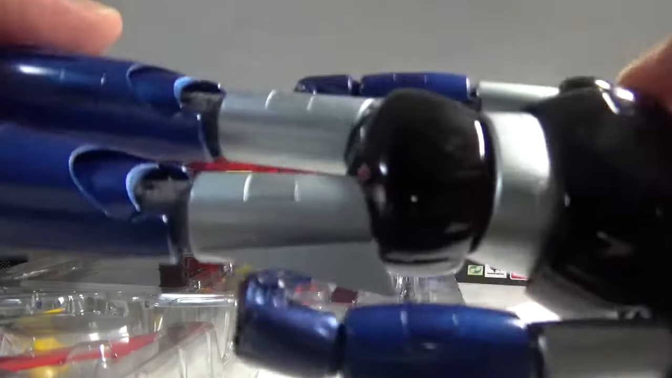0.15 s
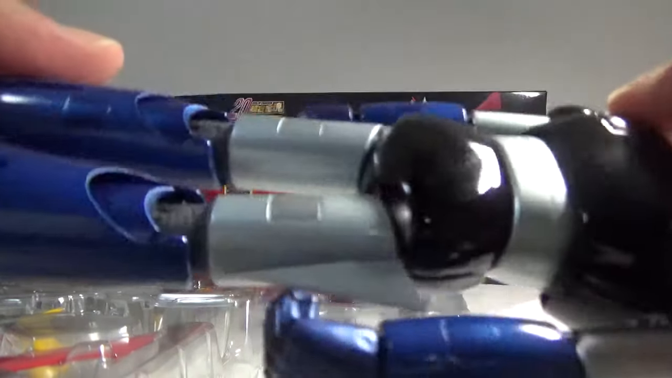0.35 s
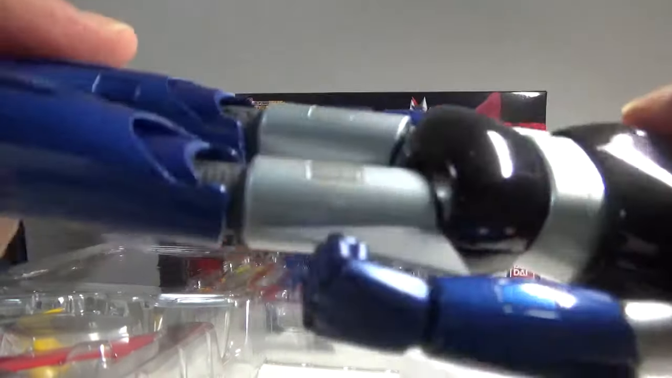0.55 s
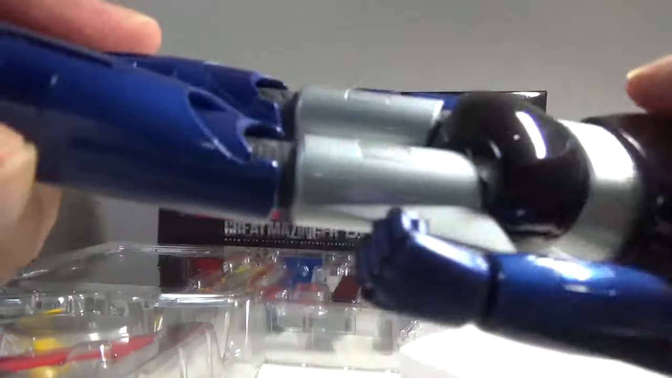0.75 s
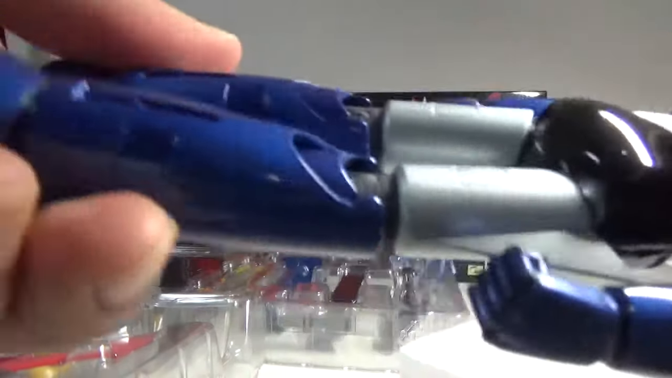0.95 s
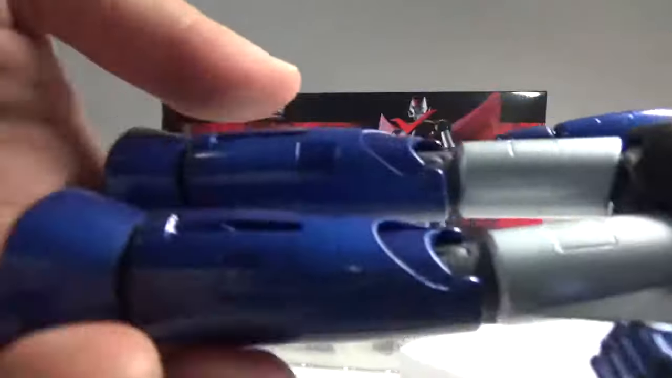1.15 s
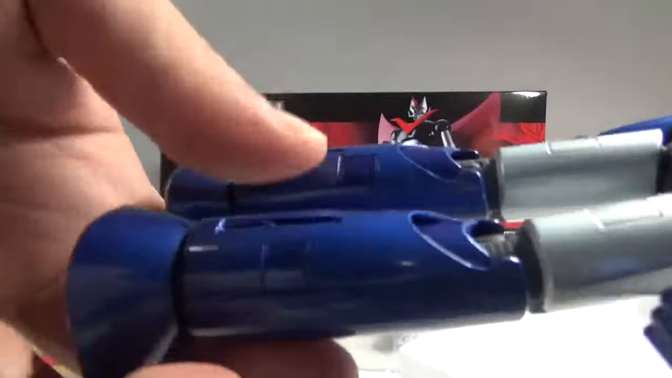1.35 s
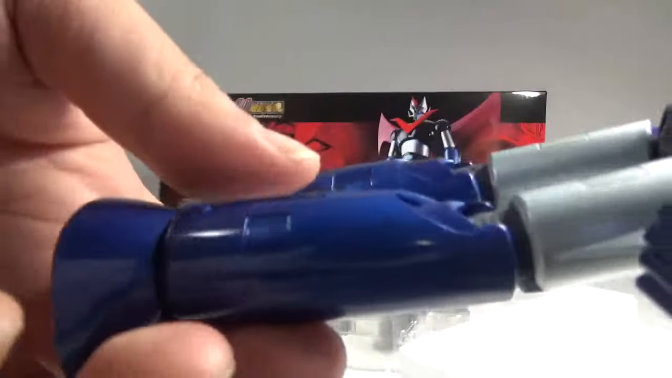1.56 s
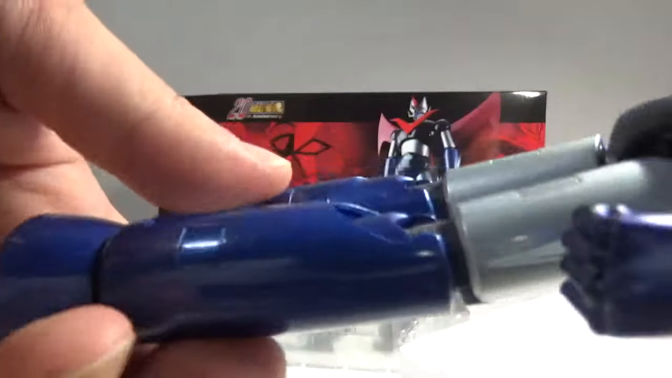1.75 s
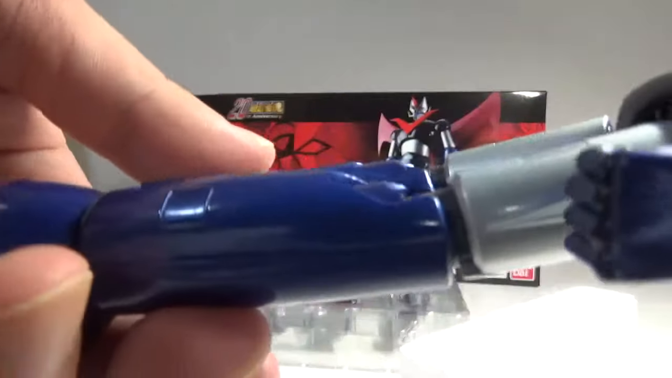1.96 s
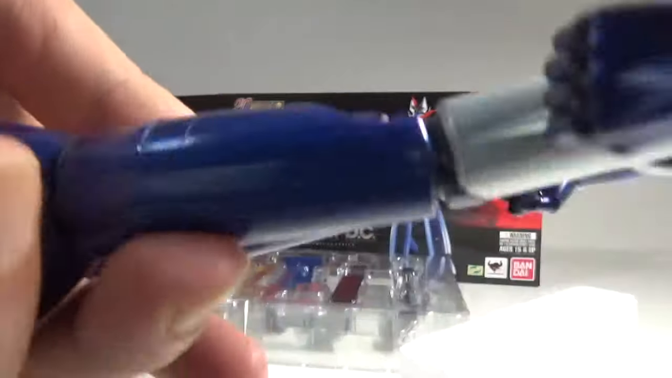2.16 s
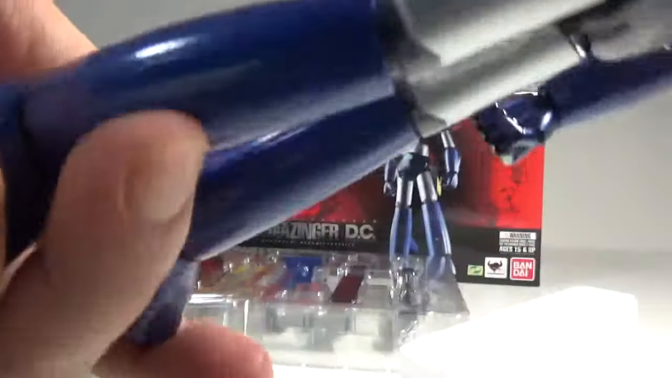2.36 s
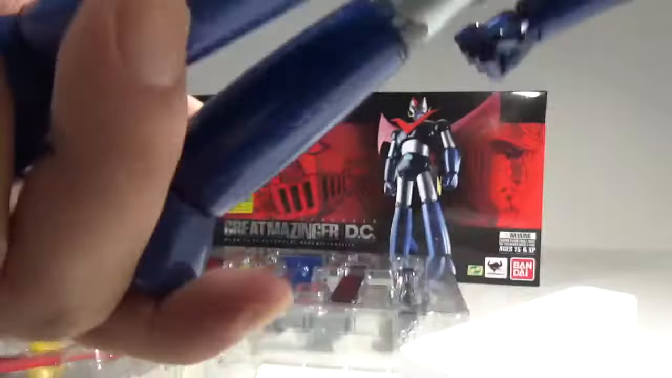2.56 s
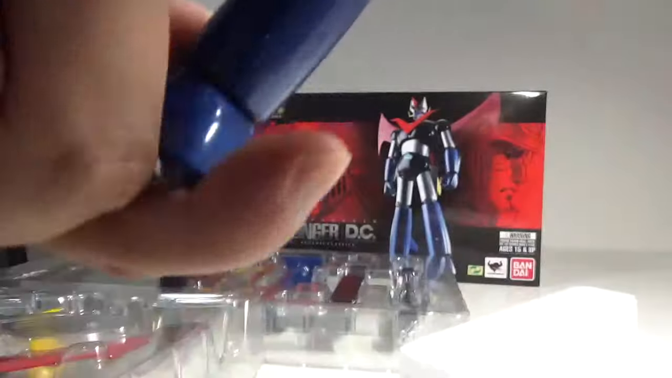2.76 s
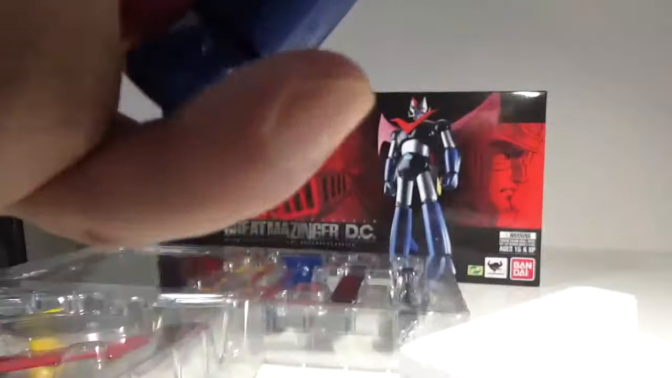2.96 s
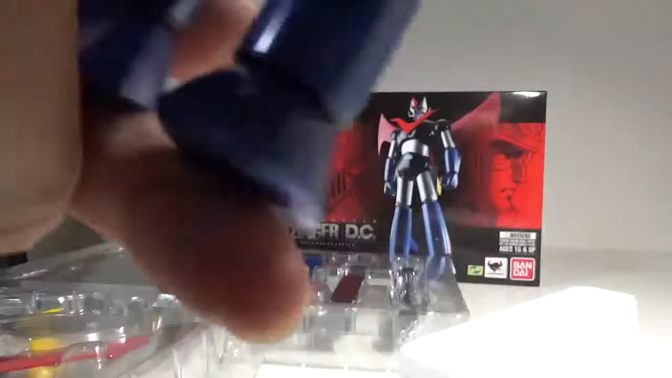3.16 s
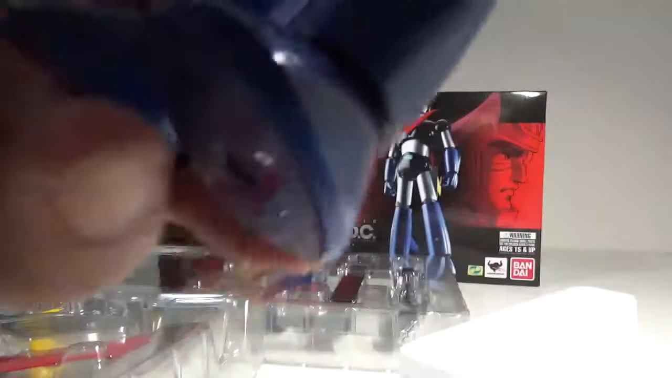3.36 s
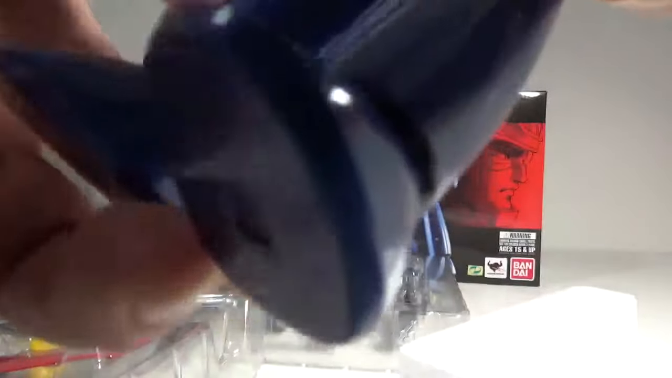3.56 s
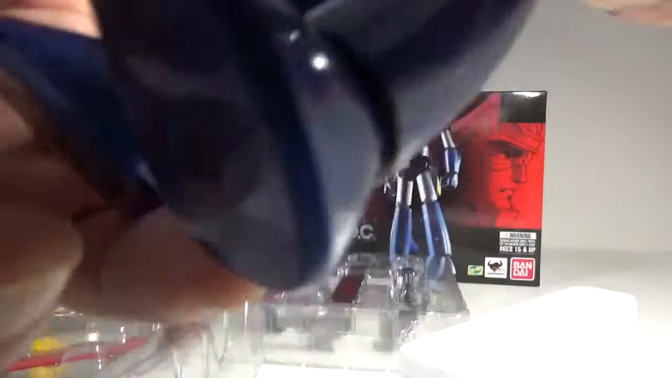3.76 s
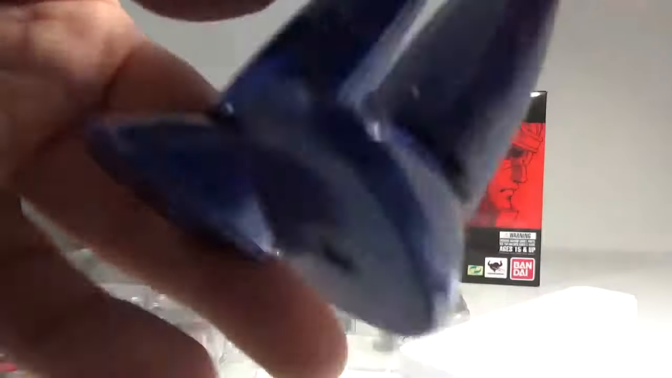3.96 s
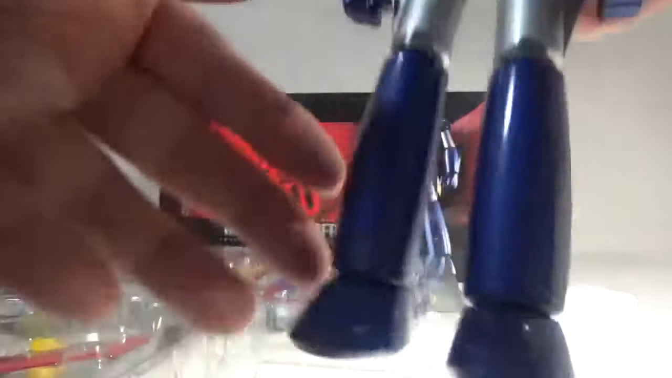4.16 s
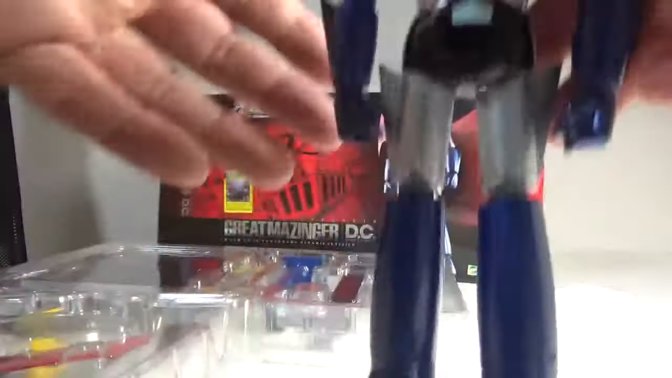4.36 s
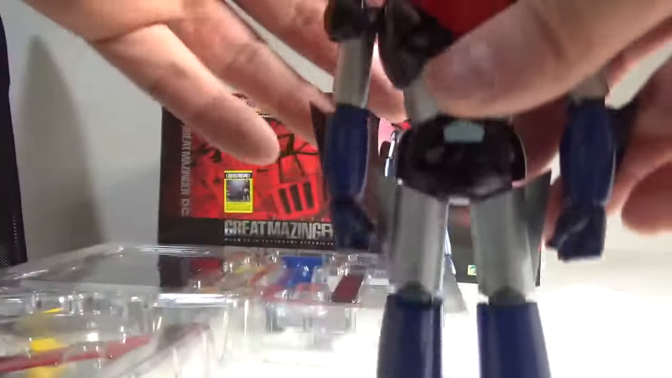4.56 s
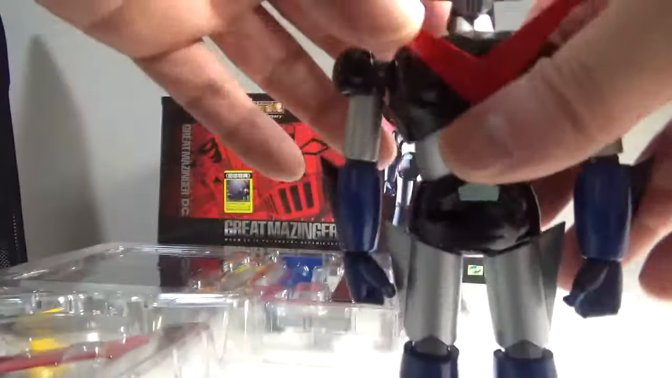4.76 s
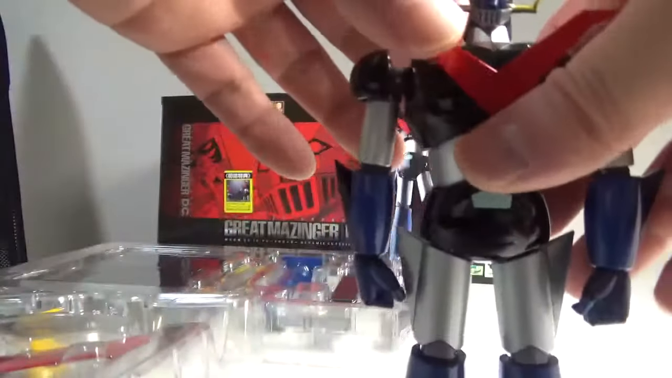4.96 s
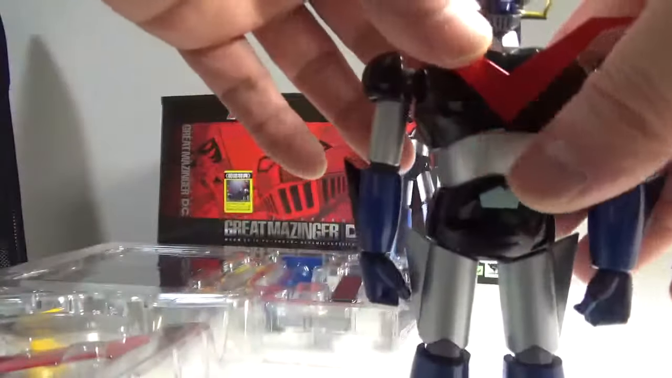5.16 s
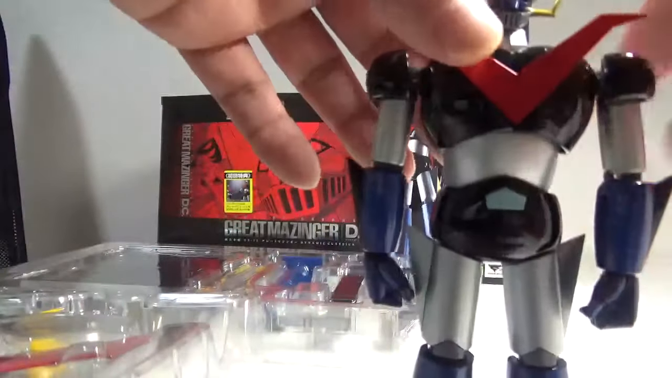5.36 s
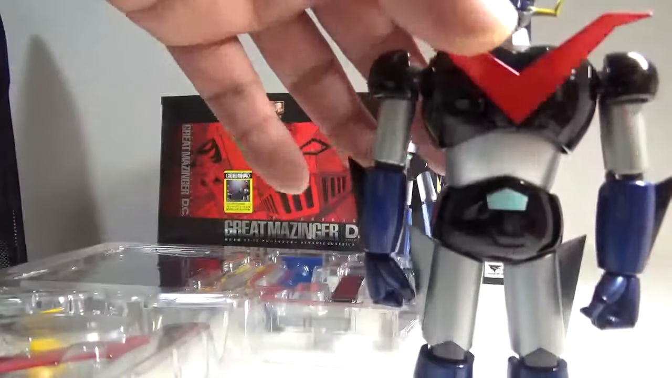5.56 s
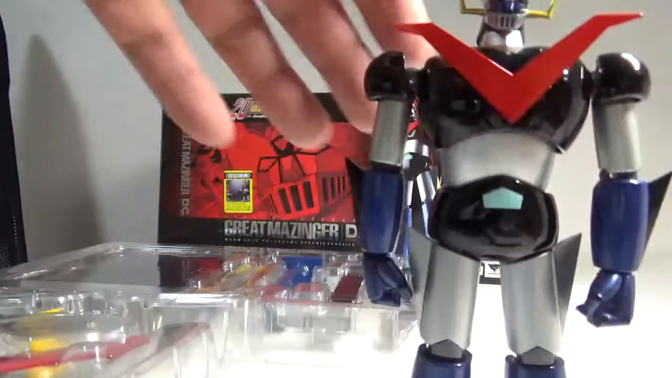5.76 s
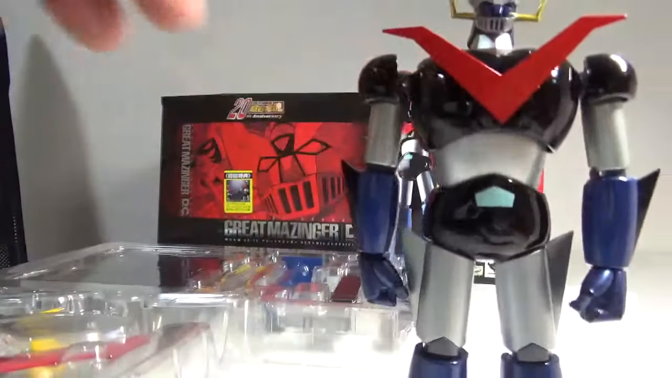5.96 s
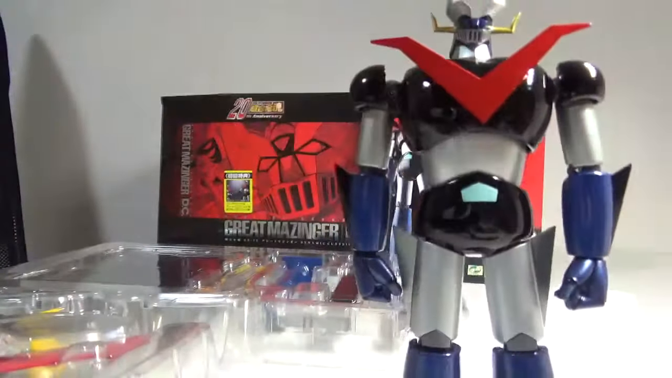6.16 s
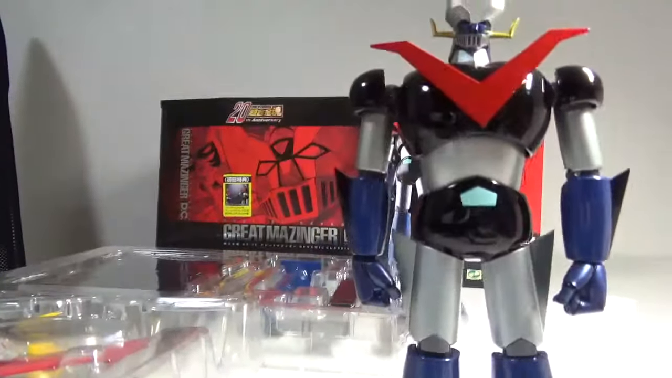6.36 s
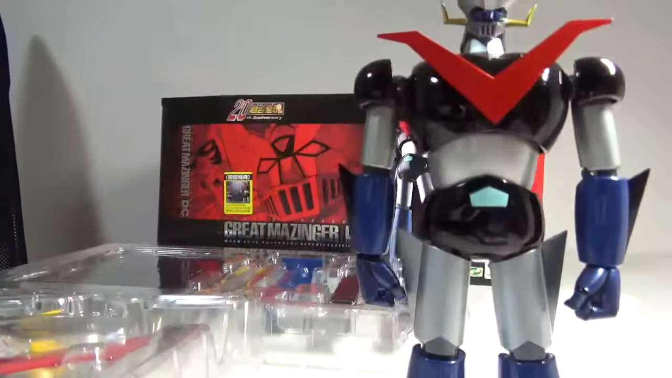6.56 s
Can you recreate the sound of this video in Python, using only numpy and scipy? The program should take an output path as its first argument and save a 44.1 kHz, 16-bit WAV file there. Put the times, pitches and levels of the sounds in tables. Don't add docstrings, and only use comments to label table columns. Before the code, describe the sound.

Irregular tiny metallic snaps and ticks from a die-cast figure's limbs, close and crisp, with airy finger friction and a brief cloth brush on the table. A sharp snap stands alone midway, then it grows sparser. A solid woody knock lands with a rattling click, then smaller taps as the feet settle, and finally light plastic tray crackle. Short indoor room tail, quiet rumble, steady hiss and a barely audible high whine.

```python
import sys
import numpy as np
from scipy import signal
from scipy.fft import rfft, irfft, next_fast_len
from scipy.io import wavfile
from scipy.ndimage import uniform_filter1d

SR = 44100
rng = np.random.default_rng(int(sys.argv[2]) if len(sys.argv) > 2 else 0)


def file_out(sig):
    cols = np.atleast_2d(sig).T
    lim = np.clip(cols, -1, 1)
    pcm = np.round(lim * 32767).astype(np.int16)
    wavfile.write(sys.argv[1], SR, pcm)


def rack_gain(trim_db):
    fader = np.asarray(trim_db, float)
    return 10 ** (fader / 20)


N = 295456

# pitch_hz, level_db
EDGE_MODES = [(7200, 7), (7900, 8.5), (8500, 19), (9000, 15.5), (9500, 16.5), (10100, -1.5), (10700, -26.5)]
JOINT_MODES = [(4750, -10), (5250, 16.5), (5800, 6), (6300, 3)]
LIMB_MODES = [(3150, -5), (3480, 8), (3750, -0.5), (4050, -11.5)]
SHELL_MODES = [(1150, 5), (1450, -43), (1750, -13), (2050, 20), (2400, 18.5), (2700, 11.5)]
TRAY_MODES = [(800, -20), (1100, -5), (1400, 9), (1750, 15), (2100, 13), (2500, 9), (2900, 20)]

# start_s, edge_db, limb_db, left_minus_right_db
LIMB_CLICKS = [(0.0358, -25, -61, -4), (0.5934, -55, -50, -2), (0.697, -32, -39.5, 2),
               (0.7604, -29, -30, -5.5), (0.8904, -50, -42.5, 3), (1.0188, -52.5, -51.5, 1),
               (1.2258, -29, -44, -5), (1.7524, -37, -38.5, -6), (1.765, -47, -45, 8),
               (1.7866, -41, -48, 11), (1.8214, -44, -49, 9), (1.8286, -45, -43.5, 8),
               (1.8444, -44, -49, 8), (2.2972, -30, -38, 4), (2.3068, -47, -43.5, -2),
               (2.369, -52, -44.5, 2.1), (2.3983, -47.5, -54, -9), (2.407, -50, -48, 4),
               (2.4345, -51, -43, 2.1), (2.4544, -47, -40.5, 3), (2.576, -36.5, -37, 6),
               (2.6391, -39.5, -35, 4), (2.8735, -29, -34, -7.5), (2.8974, -39, -33, 1),
               (2.9251, -57, -42.5, 0.1), (3.065, -61, -51.5, -0.6), (3.155, -42, -45, 3.5),
               (3.2405, -37, -55, 14), (4.7536, -30.5, -53, 1.5), (4.7636, -26, -44, -3.5)]
# start_s, edge_db, joint_db, left_minus_right_db
JOINT_CLICKS = [(0.0138, -37, -39.5, -6), (0.0277, -18, -32.5, 6.5), (0.6233, -39.5, -53, 3),
                (0.7096, -38.5, -44.5, -11), (0.725, -40, -48, 8), (0.7648, -24, -34, 6),
                (0.78, -16.5, -34, 3), (0.9323, -44, -54, -6), (0.9518, -47, -58, -4),
                (1.4224, -41, -47.5, -0.6), (2.0252, -52, -57, 0.1), (2.357, -54, -54, -7),
                (2.7106, -41.5, -55, 3), (2.8673, -11.5, -30, -2.5), (2.992, -42, -45.5, -2.5),
                (3.427, -43.5, -55, 8), (5.0245, -54, -68, 1), (5.0675, -27, -50, 6),
                (5.1573, -59.5, -56, 1), (5.2484, -44, -66, 2), (5.33, -29, -43.5, -6.5)]
# start_s, edge_db, shell_db, left_minus_right_db
SHELL_CLICKS = [(0.5799, -33, -48, 5), (0.915, -48, -56, -6), (1.14, -43, -59.5, 10),
                (1.7324, -52, -59, -1.1), (1.7442, -25, -36, 5), (1.8548, -31, -41.5, 3.5),
                (2.559, -42, -54, -11), (3.1067, -51, -60, 10), (3.186, -48, -62, 8), (3.23, -45, -56, 8),
                (3.4755, -16, -48, 3.5), (3.6194, -51, -67, 4), (4.7583, -28, -50, -9),
                (4.7724, -17.5, -30, 2.5), (4.886, -42.5, -60, -5), (4.973, -22, -40.5, 1.1),
                (5.1155, -69, -58, -4), (5.239, -44, -70, 4), (5.5652, -51, -67, 0.1),
                (6.1523, -31, -48, -3.5)]
# start_s, edge_db, tray_db, left_minus_right_db
CRACKLES = [
    (6.3468, -48, -38.5, 11),
    (6.3496, -42, -37, -8),
    (6.356, -33.5, -49, 4),
    (6.3857, -55, -48, -12),
    (6.3958, -37, -34.5, -9),
    (6.4007, -27, -32, 6),
    (6.4075, -44, -39.5, 11),
    (6.4127, -54, -66, -6),
    (6.517, -54, -62, 0.1),
    (6.546, -48.5, -45, -3),
]
# joints_db, limbs_db, shell_or_tray_floor_db
LIMB_SPREAD_DB, JOINT_SPREAD_DB = (-10, 1.6, -7.5), (2, -1.4, -10.5)
SHELL_SPREAD_DB, TRAY_SPREAD_DB = (-0.31, -9, 4.7), (-7.5, 0.5, 5.3)
PART_T60_S, TRAY_T60_S = .008, .004

# start_s, peak_db, pitch_hz,
# t60_s
PART_RINGS = [(0.027, -39, 5270, 0.03), (0.028, -25, 8600, 0.0077), (0.741, -50, 8140, 0.096),
              (0.7637, -37, 3735, 0.14), (0.7625, -24, 4880, 0.026), (0.762, -28, 3300, .02),
              (0.763, -38, 2800, .027), (0.781, -36, 2750, .015), (0.036, -40, 8500, .06),
              (1.7455, -40, 2000, .015), (1.7455, -38, 2900, .015), (1.856, -42, 2150, .015),
              (1.445, -58, 3000, .01), (1.016, -64, 5500, 0.2), (1.1394, -41.5, 8490, 0.012),
              (1.225, -31, 3720, 0.014), (1.748, -33.5, 1020, 0.038), (4.7741, -13, 1260, 0.0064),
              (4.773, -24, 6300, .008), (0.7645, -26, 8700, .02), (0.763, -30, 9600, .02),
              (0.781, -26, 7400, .008), (0.782, -34, 4750, .015), (0.726, -42, 4800, .03),
              (2.867, -34, 3300, .03), (1.8545, -36.5, 5250, 0.014), (2.296, -38, 3380, 0.015),
              (2.56, -39.5, 8040, 0.018), (2.575, -29.5, 3520, 0.017), (2.6389, -39, 3530, 0.0085),
              (2.868, -31, 5740, 0.043), (2.866, -32, 3860, 0.037), (2.866, -43.5, 1740, 0.029),
              (3.428, -38.5, 5430, 0.0072), (3.4755, -18, 6000, 0.004), (4.974, -34.5, 1940, 0.019),
              (5.0675, -30, 5380, 0.022), (5.116, -50, 2600, .008), (3.4755, -33, 4300, .004),
              (3.4755, -41, 3100, .004), (5.068, -28, 8300, 0.008), (5.068, -34, 7100, 0.02),
              (5.025, -50, 7500, .01), (5.3305, -20, 9340, 0.0097), (5.332, -41, 3720, 0.03),
              (6.154, -42.5, 6000, .02), (6.154, -41, 8650, 0.019), (6.155, -60, 3780, 0.075)]
RING_RISE_SAMPLES = 44

# start_s, low_peak_db, upper_modes_db, contact_ms, depth_db
KNOCKS = [
    (1.7445, -66, -43, 2.25, -1),
    (4.7715, -37, -29.5, 3.64, -6),
    (4.7723, -15.5, -22.5, 1.77, -2),
    (4.973, -31, -46, 1.4, 9),
    (5.067, -33, -56, 1.3, 2),
    (5.264, -46, -70, 4.6, 0),
    (6.152, -42, -55.5, 3, 7.5),
    (6.196, -54, -76, 3.3, 0.6),
]
# pitch_hz, level_db, t60_s
TABLE_MODES = [(54, -23, .22), (70, -20, .2), (103, -8, .18), (135, -7, .15), (166, -1, .15), (205, -3, .1),
               (232, -5, .1), (259, -3, .11), (293, 1, .11), (343, 2, .11), (411, 0, .12), (478, -8, .1)]
BOARD_MODES = [(632, -9, .05), (752, -6, .05), (815, -5, .04), (876, -2, .06), (960, -2, .03),
               (1050, -2, .04), (1183, -1, .045), (1270, -2, .03), (1358, -1, .04), (1550, -3, .03),
               (1750, -8, .025), (1985, -9, .025), (2450, -10, .02)]
# start_s, peak_db, pitch_hz, t60_s, left_minus_right_db
TABLE_RINGS = [(4.779, -27, 409, .14, 0), (4.78, -28, 300, .2, 0), (4.773, -28, 880, .14, -4),
               (4.774, -33, 1480, .03, -3), (4.774, -49, 1981, .12, 3), (4.774, -46, 2444, .06, -3),
               (4.974, -34, 58, .23, 0), (4.9735, -30, 240, .03, 0), (4.975, -47, 409, .15, 0),
               (4.974, -38, 1550, .03, -3), (5.066, -31, 220, .03, 0), (5.07, -39, 409, .17, 0),
               (5.068, -41, 291, .2, 0), (5.068, -42, 748, .044, 2), (5.068, -45, 1340, .02, 0),
               (5.068, -44, 2250, .02, 0), (5.263, -44, 170, .06, 0), (5.07, -42, 130, .45, 0),
               (6.5462, -40, 1150, .018, -3), (6.347, -40, 1900, .012, 3)]
THIN_HZ, THIN_OCTAVE_DB = 71, 4.5

# loudest_s, rise_s, fall_s, hiss_db, scrape_db
RUBS = [(0.685, .04, 0.011, -63, -63), (0.756, 0.023, .01, -51, -64), (0.792, .01, .03, -54, -74),
        (0.893, .03, .08, -65, -66), (1.148, .01, .03, -68, -66), (1.2, 0.07, .02, -61.5, -80),
        (1.775, 0.066, 0.16, -54, -52.5), (1.905, .008, .01, -62, -55), (1.917, .008, .01, -62, -56),
        (2.56, 0.023, 0.019, -57.5, -59), (2.587, .01, 0.06, -66, -76), (3.205, 0.099, 0.12, -45.5, -59),
        (3.208, 0.032, 0.017, -71, -47.5), (3.238, 0.031, 0.062, -56, -78),
        (3.434, 0.0073, 0.027, -57, -81), (3.468, 0.053, 0.003, -52, -63), (4.022, .07, .1, -69, -77),
        (4.757, 0.0092, .03, -68, -77), (4.768, 0.0057, .006, -47, -69), (4.967, 0.035, 0.0041, -63, -60),
        (5.122, 0.0073, .1, -71, -75), (5.244, 0.045, .07, -64, -77), (5.318, 0.022, 0.01, -82, -67),
        (6.28, 0.25, .15, -71.5, -68.5)]
# loudest_s, rise_s, fall_s, rustle_db, rumble_db
DRAGS = [
    (1.785, 0.069, 0.12, -51, -61),
    (1.815, 0.045, 0.11, -70, -55),
    (2.72, 0.13, 0.68, -75.5, -66),
    (4.785, .01, .13, -46, -42),
    (5.0, .02, .1, -70, -46),
    (5.09, 0.026, 0.1, -80, -57),
    (5.22, 0.3, .1, -78, -64),
    (5.345, 0.096, 0.032, -65.5, -62.5),
    (6.205, 0.012, 0.074, -72, -79),
    (6.33, 0.39, 0.023, -70.5, -71.5),
]
SWELL_DB = 24
# freq_hz, density_db
HISS_COLOUR = [(2940, -34), (5000, -18.5), (7310, -17), (8880, 0), (9110, -4), (9700, -13), (11000, -15),
               (14300, -20), (22000, -120)]
SCRAPE_COLOUR = [(820, -43), (1400, -23), (2010, 3), (2500, -3), (2980, -10), (3220, -9), (6000, -6),
                 (7800, -24), (13200, -120)]

# start_s, centre_hz, level_db
SLIDES = [
    [(1.75, 1000, -62), (1.785, 950, -51), (1.815, 680, -51), (1.845, 420, -54), (1.875, 260, -57),
     (1.91, 180, -66)],
    [(3.12, 8200, -74), (3.18, 8500, -53), (3.21, 8800, -52), (3.235, 8900, -47), (3.26, 9100, -54),
     (3.3, 9000, -62), (3.33, 9100, -74)],
]
SLIDE_WIDTHS_HZ = 900, 800
# start_s, pitch_hz, level_db
SQUEAKS = [
    [(2.585, 8600, -84), (2.64, 9600, -84), (2.671, 10000, -74), (2.733, 10700, -68), (2.789, 10300, -78),
     (2.835, 10327, -75), (2.85, 10135, -82)],
    [(1.895, 5230, -77), (1.907, 5060, -62), (1.917, 5100, -60), (1.925, 5130, -72)],
    [(3.27, 5150, -78), (3.287, 5430, -68), (3.301, 5100, -82), (3.312, 5300, -70), (3.33, 5020, -82)],
]

# freq_hz, level_db
ROOM_COLOUR = [(100, -1), (1000, 11.5), (4000, 5), (9000, 0), (11000, -2.5)]
ROOM_T60_S, ROOM_DB, DESK_ECHO_MS, DESK_ECHO_DB = 0.31, -18.5, 11, -51

# freq_hz, density_db
AIR_COLOUR = [(15, -25), (25, 5), (101, -2), (260, -1), (296, -6), (444, -8), (721, -11.5), (884, -12.5),
              (2450, -17), (3410, -17), (4400, -20), (9200, -20.5), (11000, -24.5), (14300, -57),
              (22000, -120)]
# freq_hz, side_minus_mid_db
AIR_SIDE = [(60, -24.5), (110, -14.5), (190, -14), (350, -5.5), (620, -0.5), (1120, 1), (2010, -1),
            (3610, -4), (6480, -5), (11600, -9)]
AIR_DB = -62.5
WHINE_HZ, WHINE_WIDTH_HZ, WHINE_DB = 7865, 70, -78
TOP_HZ = 11050


def band(x, lo_hz, hi_hz):
    return signal.sosfilt(signal.butter(3, [lo_hz, hi_hz], "bandpass", fs=SR, output="sos"), x)


def unit(x):
    return x / np.sqrt(np.mean(x ** 2))


def walk(rate_hz):
    hold = int(SR / rate_hz)
    steps = np.repeat(rng.standard_normal(N // hold + 1), hold)
    slewed = uniform_filter1d(uniform_filter1d(steps, hold), hold)
    return 1.3 * slewed[:N]


def shape(x, colour):
    hz, db = np.transpose(colour)
    size = next_fast_len(len(x))
    f = np.maximum(np.arange(size // 2 + 1) * SR / size, 1)
    gain = rack_gain(np.interp(np.log(f), np.log(hz), db))
    return irfft(rfft(x, size) * gain, size)[:len(x)]


def ring(modes, push, scatter_db):
    hz, db, t60 = np.transpose(modes)[:, :, None]
    chance = rng.standard_normal((2, len(modes), 1))
    t = np.arange(int(SR * min(np.max(t60), .4))) / SR
    level = rack_gain(db + scatter_db * chance[0])
    detune = 1 + .004 * scatter_db * chance[1]
    decay = 1000 ** (-t / np.maximum(t60, .003))
    free = level * np.sin(2 * np.pi * hz * detune * t) * decay
    sound = signal.fftconvolve(free.sum(axis=0), push)
    return sound / np.max(np.abs(sound))


def add(out, start_s, sound, pan_db):
    i = int(start_s * SR)
    piece = sound[:N - i]
    out[:, i:i + len(piece)] += piece * rack_gain(np.array([[pan_db], [-pan_db]]) / 2)


def inside(t, start_s):
    return np.clip(np.minimum(t - start_s[0], start_s[-1] - t) / .006, 0, 1)


def clicks():
    figure = EDGE_MODES, JOINT_MODES, LIMB_MODES, SHELL_MODES
    tray = EDGE_MODES, JOINT_MODES, LIMB_MODES, TRAY_MODES
    out = touches(LIMB_CLICKS, figure, LIMB_SPREAD_DB, PART_T60_S, rattle=0.086)
    out += touches(JOINT_CLICKS, figure, JOINT_SPREAD_DB, PART_T60_S, rattle=0.086)
    out += touches(SHELL_CLICKS, figure, SHELL_SPREAD_DB, PART_T60_S, rattle=0.086)
    return out + touches(CRACKLES, tray, TRAY_SPREAD_DB, TRAY_T60_S, rattle=0.32)


def touches(events, families, spread_db, t60_s, rattle):
    out = np.zeros((2, N))
    for start_s, edge_db, part_db, pan_db in events:
        push = contact(rattle, rattle_s=0.0079)
        levels_db = (edge_db, *(part_db + np.array(spread_db)))
        for modes, db in zip(families, levels_db):
            parts = [(f, g, t60_s * np.sqrt(8000 / f)) for f, g in modes]
            sound = band(ring(parts, push, scatter_db=3), .72 * modes[0][0], 1.25 * modes[-1][0])
            add(out, start_s, rack_gain(db) * sound, np.clip(pan_db, -8, 8))
    return out


def contact(rattle, rattle_s):
    t = np.arange(1500) / SR
    decay = np.exp(-t / 0.001) + rattle * np.exp(-t / rattle_s)
    return rng.standard_normal(len(t)) * np.minimum(t / 0.00027, 1) * decay


def singing():
    out = np.zeros((2, N))
    t = np.arange(RING_RISE_SAMPLES) / SR
    for start_s, db, hz, t60_s in PART_RINGS:
        swing = np.sin(2 * np.pi * hz * t) * np.hanning(RING_RISE_SAMPLES)
        add(out, start_s, rack_gain(db) * ring([(hz, 0, t60_s)], swing, scatter_db=0), 0)
    return out


def knocks():
    out, t = np.zeros((2, N)), np.arange(4000) / SR
    for start_s, low_db, upper_db, contact_ms, depth_db in KNOCKS:
        blow = np.hanning(3 + int(max(contact_ms, .2) * SR / 1000))
        shudder = rng.standard_normal(len(t)) * np.exp(-t / .02) * .03
        shudder[0] = 1
        push = signal.fftconvolve(shudder, blow)
        sharp_push = signal.fftconvolve(shudder, blow[::4])
        table = [(f, g + depth_db * np.log2(200 / f), t60) for f, g, t60 in TABLE_MODES]
        corner_hz = THIN_HZ * 2 ** (-depth_db / THIN_OCTAVE_DB)
        thump = band(ring(table, push, scatter_db=1.2), corner_hz, 3000)
        add(out, start_s, rack_gain(low_db) * thump, 0)
        add(out, start_s, rack_gain(upper_db + 8) * ring(BOARD_MODES, sharp_push, scatter_db=1.5), 0)
    return out


def table_rings():
    out = np.zeros((2, N))
    for start_s, db, hz, t60_s, pan_db in TABLE_RINGS:
        push = np.hanning(3 + int(SR / hz / 2))
        add(out, start_s, rack_gain(db) * ring([(hz, 0, t60_s)], push, scatter_db=0), pan_db)
    return out


def rubs():
    hiss = unit(shape(grains(), HISS_COLOUR))
    scrape = unit(shape(grains(), SCRAPE_COLOUR))
    return swells(RUBS, (hiss, scrape))


def drags():
    rustle = unit(band(grains(), 425, 1420))
    rumble = unit(band(grains(), 73, 580))
    return swells(DRAGS, (rustle, rumble))


def grains():
    return rng.standard_normal(N) * rack_gain(2.5 * walk(400) + 1.5 * walk(70))


def swells(events, layers):
    gains, t = np.zeros((len(layers), N)), np.arange(N) / SR
    for loudest_s, rise_s, fall_s, *levels_db in events:
        near = slice(max(int((loudest_s - 2 * rise_s) * SR), 0), int((loudest_s + 2 * fall_s) * SR))
        before = (loudest_s - t[near]) / max(rise_s, .003)
        after = (t[near] - loudest_s) / max(fall_s, .003)
        stroke = rack_gain(-SWELL_DB * np.maximum(before, after))
        gains[:, near] += stroke * rack_gain(np.array(levels_db))[:, None]
    return np.sum(gains * layers, axis=0)


def slides():
    out, t = np.zeros(N), np.arange(N) / SR
    for table, width_hz in zip(SLIDES, SLIDE_WIDTHS_HZ):
        start_s, hz, db = np.transpose(table)
        phase = 2 * np.pi * np.cumsum(np.interp(t, start_s, hz)) / SR
        a, b = (unit(band(rng.standard_normal(N), 10, width_hz / 2)) for _ in range(2))
        level = rack_gain(np.interp(t, start_s, db) + 1.5 * walk(300))
        out += inside(t, start_s) * level * (a * np.cos(phase) + b * np.sin(phase))
    return out


def squeaks():
    out, t = np.zeros(N), np.arange(N) / SR
    for table in SQUEAKS:
        start_s, hz, db = np.transpose(table)
        waver_hz = 130 * walk(600) * np.clip(2 - np.mean(hz) / 6000, .3, 1)
        phase = 2 * np.pi * np.cumsum(np.interp(t, start_s, hz) + waver_hz) / SR
        level = rack_gain(np.interp(t, start_s, db) + 2.5 * walk(98))
        out += inside(t, start_s) * np.sqrt(2) * np.sin(phase) * level
    return out


def room(x):
    t = np.arange(int(.4 * SR)) / SR
    shared, own = rng.standard_normal(len(t)), rng.standard_normal((2, len(t)))
    tail = (shared + 1.35 * own) * np.minimum(t / 0.00047, 1) * 1000 ** (-t / ROOM_T60_S)
    tail = np.array([shape(side, ROOM_COLOUR) for side in tail])
    tail *= rack_gain(ROOM_DB) / np.sqrt(np.sum(tail ** 2, axis=1, keepdims=True))
    tail[:, int(DESK_ECHO_MS * SR / 1000)] += rack_gain(DESK_ECHO_DB)
    return x + signal.fftconvolve(x, tail, axes=1)[:, :N]


def air():
    mid, side = (shape(rng.standard_normal(N), AIR_COLOUR) for _ in range(2))
    rumble = band(mid, 27.1, 680)
    mid = mid + rumble * (rack_gain(1.3 * walk(3.7)) - 1)
    side = shape(side, AIR_SIDE)
    whine_hz = WHINE_HZ + WHINE_WIDTH_HZ * walk(300)
    whine = np.sqrt(2) * np.sin(2 * np.pi * np.cumsum(whine_hz) / SR)
    scale = rack_gain(AIR_DB) / np.sqrt(np.mean(mid ** 2))
    return scale * np.array([mid + side, mid - side]) + rack_gain(WHINE_DB) * whine


def scene():
    handled = clicks() + knocks() + table_rings() + rubs() + drags() + slides() + squeaks()
    return room(handled) + singing() + air()


def low_pass(x):
    return signal.sosfilt(signal.butter(12, 12230, fs=SR, output="sos"), x)


def record(dry):
    lean = signal.sosfilt(signal.butter(4, 42, "highpass", fs=SR, output="sos"), dry)
    narrow = signal.sosfilt(signal.ellip(8, .2, 38, TOP_HZ, fs=SR, output="sos"), lean)
    return low_pass(narrow)


dry = scene()
out = record(dry)
file_out(out)
```